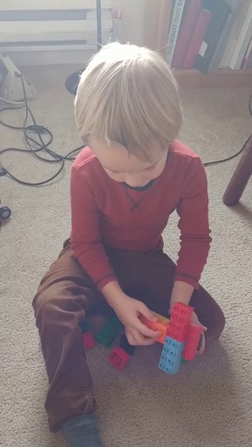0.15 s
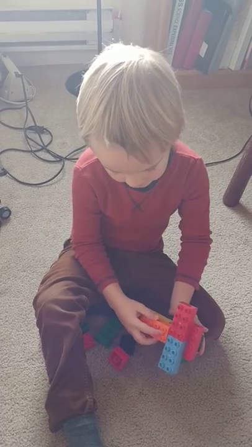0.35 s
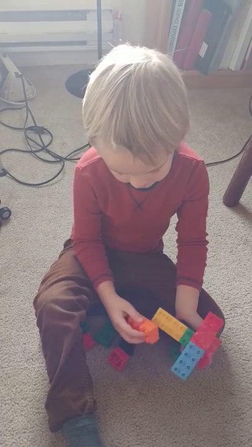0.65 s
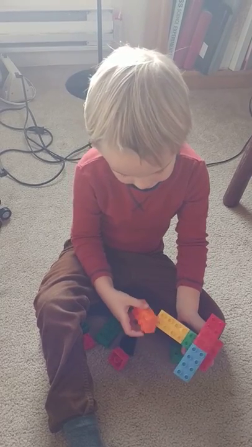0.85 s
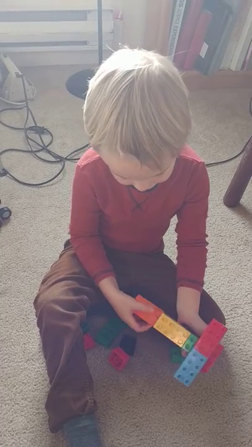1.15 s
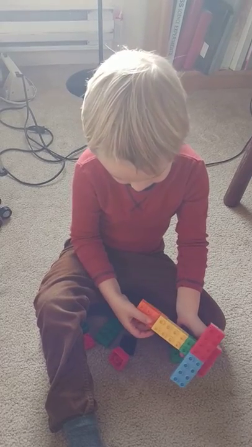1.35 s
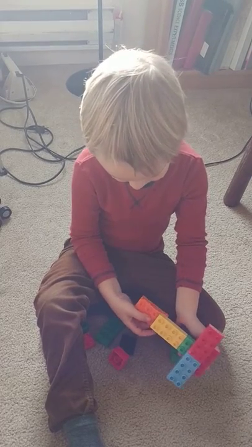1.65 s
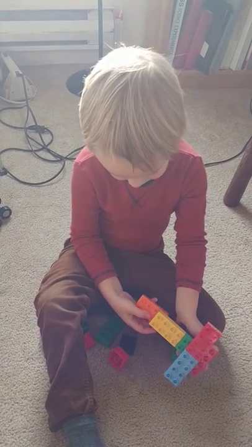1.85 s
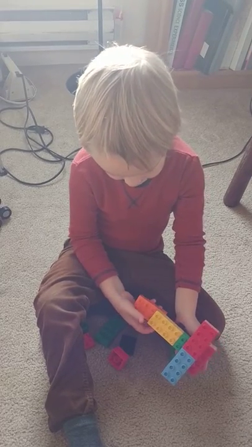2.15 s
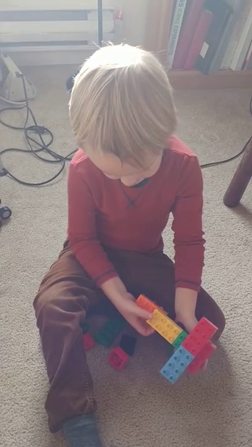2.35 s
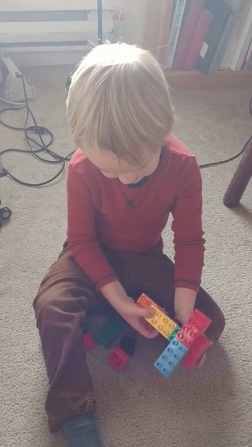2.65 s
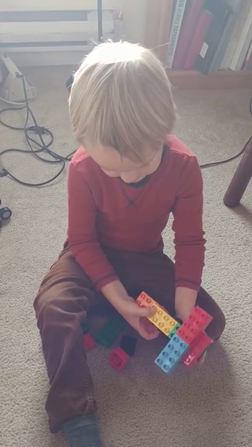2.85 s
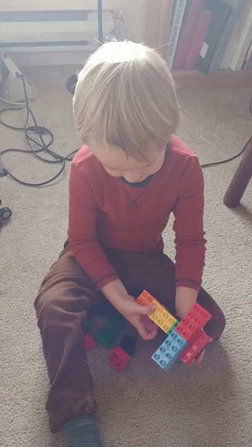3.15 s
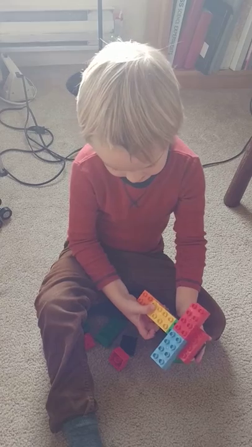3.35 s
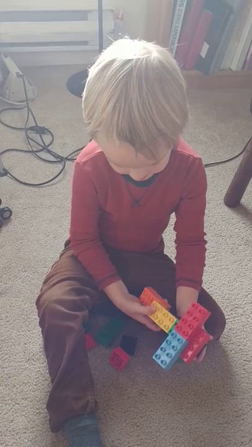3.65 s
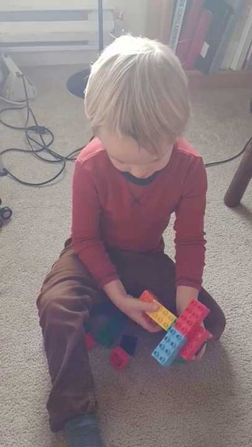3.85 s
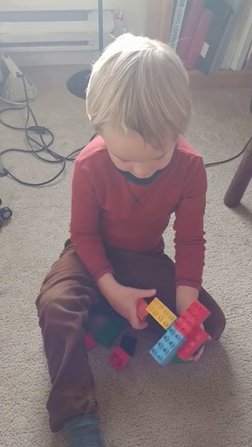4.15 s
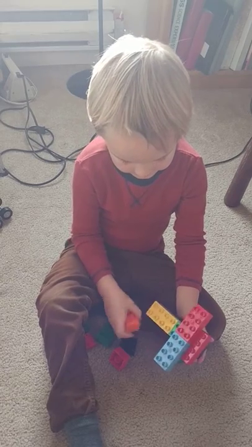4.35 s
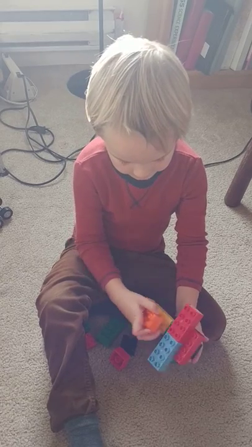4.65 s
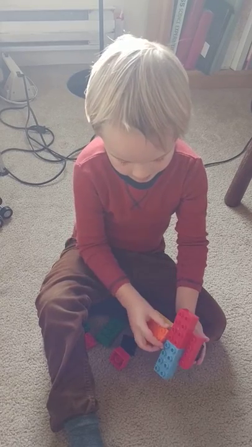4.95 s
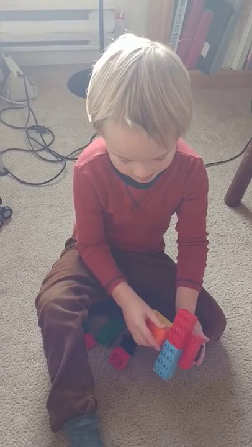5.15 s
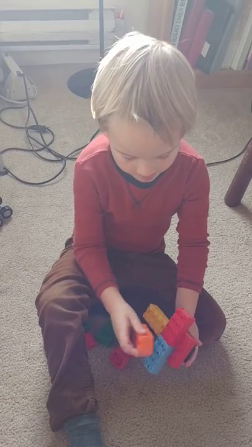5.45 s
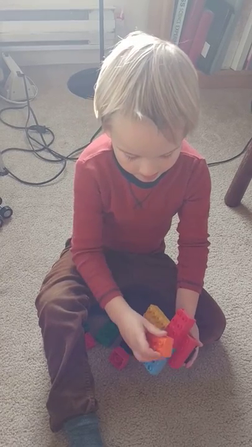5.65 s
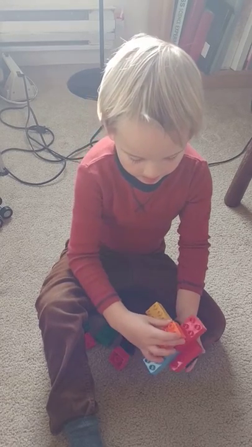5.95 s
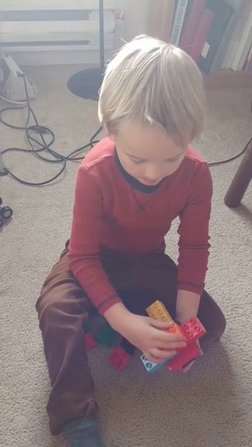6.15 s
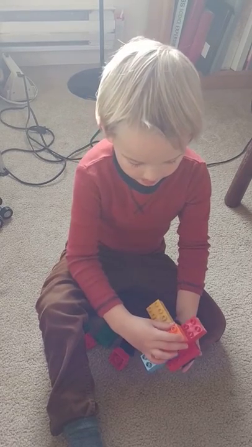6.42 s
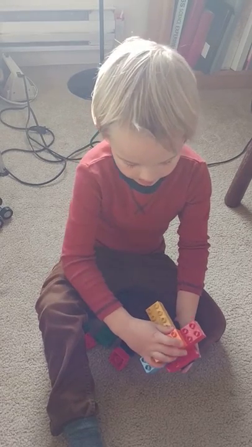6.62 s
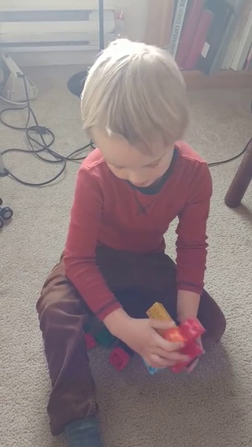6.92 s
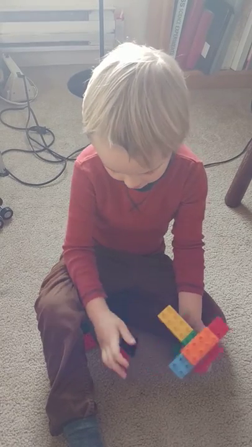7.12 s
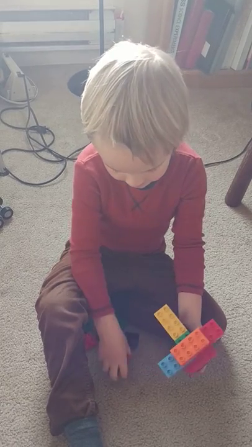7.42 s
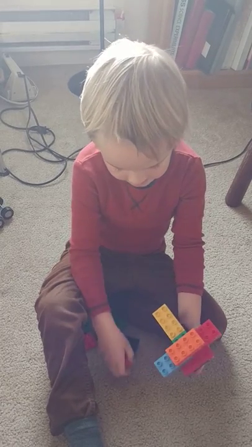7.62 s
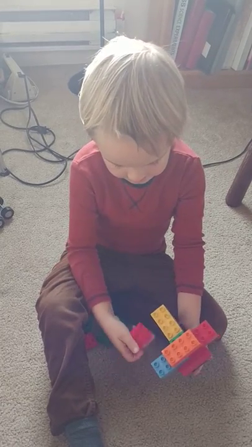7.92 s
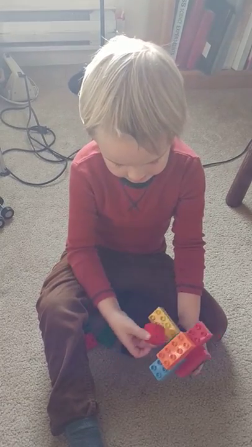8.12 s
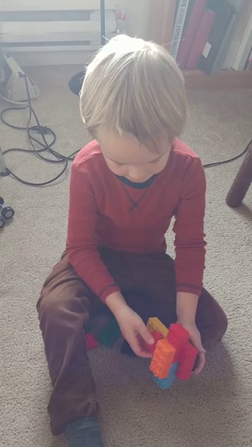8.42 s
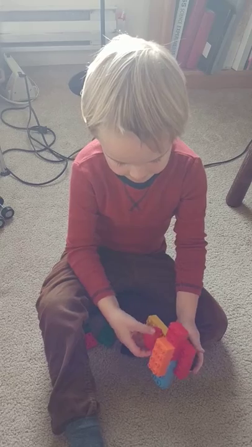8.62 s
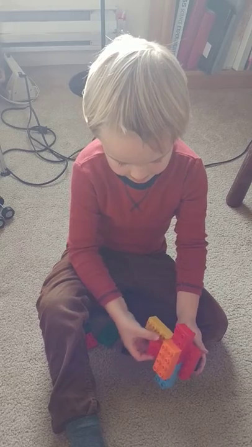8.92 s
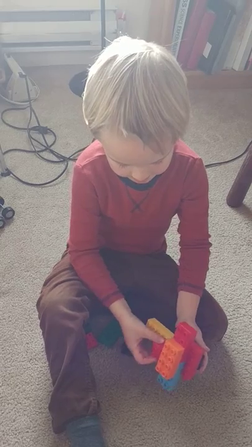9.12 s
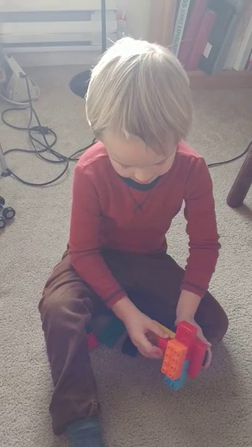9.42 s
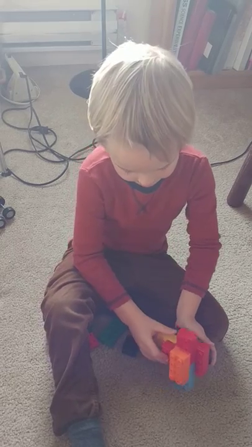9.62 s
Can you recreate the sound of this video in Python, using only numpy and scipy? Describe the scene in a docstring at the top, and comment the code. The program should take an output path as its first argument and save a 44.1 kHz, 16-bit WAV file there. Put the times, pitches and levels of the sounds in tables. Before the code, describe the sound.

Large hollow plastic toy bricks click, clack and snap together in a child's hands in a carpeted room, over faint hum, hiss and thin whistle.

```python
"""Throughout, a low room hum, rumble and hiss, with a thin wavering whistle at the left microphone.
Over it, large hollow plastic bricks are knocked, pushed together and pulled apart over a carpet in a furnished room.
Every contact rings the same brick walls, louder near the wall that is hit; studs tick past edges,
a dull knock lands on the floor, and a soft room answers briefly. Noise makes the background and the room's tail,
a wandering sine the whistle, and decaying sines the contacts."""
import sys
import numpy as np
from scipy import signal
from scipy.fft import rfft, irfft, next_fast_len
from scipy.io import wavfile
from scipy.ndimage import uniform_filter1d

SR = 44100
rng = np.random.default_rng(int(sys.argv[2]) if len(sys.argv) > 2 else 0)


def transcribe(u):
    """Save the signal u as a 16-bit wav file named by the first command-line argument.

    u: samples, shape (n,) or (channels, n), limited to [-1, 1]; the rate is SR.
    q: integer samples, one column per channel.
    """
    v = np.clip(np.atleast_2d(u).T, -1, 1)
    q = np.round(v * 32767).astype(np.int16)
    wavfile.write(sys.argv[1], SR, q)


N = 431298


def from_db(db):
    """Gain of a level in dB."""
    return 10 ** (np.asarray(db) / 20)


def rms_one(x):
    """Scaled to rms 1."""
    return x / np.sqrt(np.mean(x ** 2) + 1e-20)


def ring(force, hz, t60):
    """A two-pole resonance: a unit click sets ringing a sine that starts at height 1 and falls 60 dB in t60."""
    radius = from_db(-60 / (t60 * SR))
    angle = 2 * np.pi * hz / SR
    return signal.lfilter([0, np.sin(angle)], [1, -2 * radius * np.cos(angle), radius ** 2], force)


def ring_time(width_hz):
    """The t60 in s of a resonance of this bandwidth: the narrower it is, the longer it rings."""
    return np.log(1000) / np.pi / width_hz


def add(out, sound, s):
    """Mixes a multichannel sound in at time s."""
    start = round(s * SR)
    out[:, start:start + sound.shape[1]] += sound[:, :N - start]


def floor():
    """Steady noise, mostly shared by both microphones in the bass and separate in the treble, plus narrow hum."""
    # room tone and hiss: freq_hz, left_db_per_hz, right_db_per_hz, likeness (1 = same at both microphones)
    room_tone = [(26.38, -122, -122, 1), (56, -102, -102, 0.96), (110, -99, -99, 0.87),
                 (272, -101, -101, 1), (450, -93, -93.5, 0.42), (1050, -99, -99, 0.32),
                 (1023, -107, -104, .1), (2800, -113, -111, 0.029), (4260, -112, -117, 0.012),
                 (8260, -106, -114, 0.0078), (8630, -126, -133, .01), (9800, -104, -127, 0.0032),
                 (13700, -113, -122, .01), (14500, -129, -129, .01)]
    # narrow hum bands: freq_hz, width_hz, rms_db
    hum_bands = [(292, 20, -76.5), (591.3, 4.7, -69), (969, 5.7, -81.5)]
    size = next_fast_len(N)
    hz, *columns = np.transpose(room_tone)
    log_hz = np.log(np.fft.rfftfreq(size, 1 / SR) + 1)
    left_db, right_db, alike = [np.interp(log_hz, np.log(hz), column) for column in columns]
    alike = np.clip(alike, 0, 1)
    mid, side = rfft(rng.standard_normal((2, size)))
    pair = np.sqrt((1 + alike) / 2) * mid + np.sqrt((1 - alike) / 2) * side * [[1], [-1]]
    # sqrt(SR / 2) brings white noise to 0 dB per Hz
    out = irfft(pair * from_db([left_db, right_db]) * np.sqrt(SR / 2), size)[:, :N]
    for band_hz, width_hz, hum_db in hum_bands:
        band = ring(rng.standard_normal(N), band_hz, ring_time(width_hz))
        out += from_db(hum_db) * rms_one(band)
    return out


def rumble():
    """Noise through two low resonances, its level fluttering at random."""
    centre_hz, width_hz = 60.4, 16
    level_db, swing_db, side_db = -73, 2.5, -7.5   # swing: rms of the flutter; side: relative to mid
    # two equal smoothing filters, each with its corner near 53 Hz
    smoothing = [[1, 0, 0, 1, -np.exp(-2 * np.pi * 1.5 / SR), 0.0073]] * 2
    flutter = rms_one(signal.sosfilt(smoothing, rng.standard_normal(N + SR))[SR:])
    t60 = ring_time(width_hz)
    upper = ring(rng.standard_normal((2, N)), centre_hz, t60)
    mid, side = rms_one(ring(upper, centre_hz * 0.87, t60 * 0.49))
    return from_db(level_db + swing_db * flutter) * (mid + from_db(side_db) * side * [[1], [-1]])


def whistle():
    """A thin sine whose pitch wanders slowly and trembles quickly."""
    # slow path of the pitch: time_s, pitch_hz
    pitch_path = [(0, 10200), (0.498, 9880), (.84, 9700), (1.2, 9900), (1.502, 9600), (2.401, 10100),
                  (2.752, 9890), (2.92, 9630), (3.751, 9950), (4.199, 9570), (4.382, 9980), (4.952, 9600),
                  (5.548, 10040), (5.899, 10020), (7.15, 9930), (7.9, 9850), (8.699, 9680), (9.048, 9590),
                  (9.479, 9750), (9.78, 9600)]
    level_db, tremble_hz, tremble_corner_hz = -65.5, 102.2, 59   # rms level, rms pitch swing, low-pass corner
    s, hz = np.transpose(pitch_path)
    t = np.arange(N) / SR
    pole = np.exp(-2 * np.pi * tremble_corner_hz / SR)
    tremble = rms_one(signal.lfilter([1], [1, -2 * pole, pole ** 2], rng.standard_normal(N)))
    pitch = np.interp(t, s, hz) + tremble_hz * tremble
    phase = 2 * np.pi * np.cumsum(pitch) / SR
    return np.sqrt(2) * from_db(level_db) * np.sin(phase)


def bricks():
    """A sharp touch and a short rub of small slips; fingers damp the walls, only those at the blow ring freely."""
    # contacts: start_s, peak_db (ahead of bass cut, room and ports), low_wall_hz, low_ring_db,
    # high_wall_hz, high_ring_db, treble_db, thud_db, sent_to_room_db
    contacts = [(0.4589, -35.5, 2430, -11, 5810, 1, -14.5, -14, 3),
                (0.4993, -34, 2290, -4, 6300, -11, -7.5, 4.5, -9),
                (0.8099, -40.5, 1630, -7, 3800, 12, -15.5, 2.5, -1),
                (0.8165, -39.5, 1660, -7, 3960, -12, -11, -2, -3),
                (0.9168, -32.5, 2620, -14, 4240, -3, -11.5, -9, -1),
                (0.9323, -29.5, 2630, -3, 3820, 3.5, -12.5, -5.5, -6),
                (0.9537, -31.5, 2630, -19, 3990, -5.5, -5.5, -6, -2),
                (1.2944, -40.5, 2870, -9.5, 3880, -1, -10, -2, 1.5),
                (1.3039, -28.5, 2495, -2, 3800, -13, -9.5, -6.5, -6),
                (1.4132, -38, 2680, -12.5, 3350, 2, -17.5, -5, -1),
                (1.4284, -41, 2900, -19, 4750, -3, -4, 4, -12),
                (1.5174, -43, 2660, 4, 7400, -6, -17, -2, -13),
                (1.6955, -55, 2680, 2.5, 3750, -6, -6, -7, -7.5),
                (1.7364, -50, 2700, -16, 5500, 3, -8, -7, -1), (1.7639, -32, 2557, 12, 6220, -8, 3, 3, -6),
                (1.8941, -38, 2910, 1, 7590, -5, -1.5, 3, -9), (2.3925, -59, 2470, -1, 6800, -8, 4, -9, -3),
                (2.4149, -53.5, 2740, -1, 6830, -6, 2, -9, -10),
                (2.5082, -45.5, 2300, -18, 6350, -8, 1, -14, -2.5),
                (3.261, -47.5, 2640, -24, 5660, -6, 3, -14, -2),
                (3.3388, -57, 1790, 4, 6200, -7, 2, -13, -7),
                (3.6287, -45, 2290, 10, 4050, -6, -6, -10, -10.5),
                (3.6534, -44, 2370, -20, 6350, -19, 1, -7, -7),
                (3.8871, -54.5, 2880, -15, 3980, -6, -23, -11, 4),
                (3.9285, -30, 2790, -13, 5860, -14, -12, -13.5, -8),
                (3.9399, -27.5, 2830, -9, 3890, -3, -11, -15, -7),
                (3.9554, -26, 3140, -14, 7200, -12, -3, -3, -5),
                (4.1214, -33.5, 2850, -5, 4100, -12, -10, -9, -3),
                (4.129, -27.5, 3180, -20, 7110, -3, -7.5, -11.5, -4),
                (4.4977, -58, 1490, -3, 3760, 1, 7, -7, -5.5),
                (4.6613, -57, 3080, -2, 7740, -6, -3, -7, -7),
                (4.786, -31, 2670, -5, 3800, 2, -10.5, -10.5, -3),
                (4.795, -40, 2310, 6, 3800, -6, -9, -7, -11), (4.8474, -41, 2260, 1, 3320, -1, -4, -10, 5),
                (4.8589, -16.5, 2330, 11, 3800, 6, 0.5, -21, -5),
                (4.9122, -18, 2700, 8.5, 3830, -6.5, 0.5, -2, -4),
                (5.0164, -48.5, 2750, -20, 7430, 6, 3, -7, -6),
                (5.0664, -56, 2800, -14, 4010, -8, -17, -4, -4),
                (5.1203, -31.5, 2850, -11, 4160, -15, -9, -7.5, -2),
                (5.1692, -29, 2390, -8, 7630, 2, -5.5, -1.5, -3.5),
                (5.237, -31.5, 2300, -7, 6300, -1.5, -6, -4.5, -6.5),
                (5.7643, -28, 2250, 8.5, 4100, -13, -17.5, -10, -1.5),
                (5.7902, -34, 2675, -2, 4056, 7, -12.5, -2, 0),
                (5.8691, -37.5, 2200, -10, 3550, -11, -15, 5, -1),
                (5.9214, -31.5, 2190, -2.5, 3600, -10, -19, -2, 0.5),
                (5.9798, -35.5, 2320, -12, 4260, -19, -19, -2.5, -0.5),
                (6.0995, -42.5, 2330, -12, 7300, -6, -16, 6.5, -3.5),
                (6.1392, -40, 2200, 0, 4260, -6, -11, -1, -2),
                (6.1489, -34, 2800, -11, 6600, -16, -2, 2.5, 1.5),
                (6.3834, -37, 2080, -7, 4270, -1, -2.5, -15, -3.5),
                (6.3974, -29.5, 1837, -4, 6340, -11, -3, -3, -4.5),
                (6.4951, -38, 2570, -15, 4190, -20, -2.5, 3.5, -5),
                (6.5834, -37, 1853, -4, 5030, -22, 4.5, 6.5, -3),
                (6.6503, -33.5, 2070, -18, 6550, -12.5, -0.5, -0.5, -1.5),
                (6.7685, -38, 3090, -5.5, 5200, -12, 1.5, 4.5, -3),
                (6.9396, -46, 2420, -15, 4030, -12, -8.5, -2.5, -1.5),
                (7.3437, -39.5, 3183, 6, 4370, 5, -5, -7.5, -4),
                (8.2192, -41, 2440, -17.5, 4900, -6, -7.5, 2.5, -5),
                (8.3779, -47.5, 1610, 4, 7180, -4, -3, -2, -5.5),
                (8.4073, -38, 2690, -7, 6100, -9, -10, -3.5, -1.5),
                (8.5131, -47, 1600, -6, 5700, -18.5, -8.5, -8, -8),
                (8.9064, -38.5, 1400, -1.5, 5100, -8, -13.5, -2.5, -6),
                (8.9126, -36, 1935, -21, 5600, -11, -12.5, -6, -1),
                (8.9585, -17, 2816, -2.5, 6360, 3.5, -7, -8, -7.5),
                (9.0199, -32.5, 2910, -10, 6090, -6, -10.5, -13, -3),
                (9.0284, -39, 2700, 6, 6220, -6, -15, -7, -9),
                (9.0389, -20.5, 2484, -2, 6100, -6, -8.5, -7, -5.5),
                (9.2728, -44.5, 1750, 11, 5840, -15, -5, -16, -2.5),
                (9.3516, -43.5, 1630, -3, 5700, -4, -8, -4.5, -4.5),
                (9.3671, -30, 2800, -11.5, 5050, -11, 2.5, -10, -4.5),
                (9.7278, -47.5, 2900, -10, 5720, -6.5, -3.5, -12.5, -6.5)]
    # modes of the brick walls: freq_hz, level_db, free_t60_s
    wall_modes = [(468, -7, 0.1), (764.4, 1.5, 0.02), (1032, -4, 0.041), (1661, -5, 0.034),
                  (1930, 2, 0.016), (2300, -0.5, 0.024), (2760, -0.5, 0.026), (2979, -0.5, 0.023),
                  (3313, -3, 0.015), (3800, -2, 0.029), (4350, 0.5, 0.0097), (4566, -2.5, 0.025),
                  (4650, -0.5, 0.017), (5460, -6, 0.028), (6220, -5, 0.016), (6700, -5.5, 0.025),
                  (7430, -2.5, 0.015), (8550, -6, 0.015), (9700, 4, 0.0095), (10830, 14.5, 0.011),
                  (11506, 21, 0.0048), (13700, 8.5, 0.0066), (13800, -6, 0.012)]
    grip = 0.15   # share of the free t60 left under the fingers
    wall_reach_oct, scatter_db, ear_scatter_db = 0.06, 2, 2.47
    rub_db, rub_t60_s, slips_per_s, attack_s = -3, 0.015, 6000, 0.0039
    crack_follows, crack_below_treble_db = 0.98, 12.5   # the top follows the treble of the blow
    lean_db, bass_cut_hz = 1, 475   # lean: left over right
    out, size = np.zeros((4, N)), 6000
    hz, base_db, t60 = np.transpose(wall_modes)
    t = np.arange(size) / SR
    signs = (-1) ** np.arange(len(hz))[:, None]
    sines = np.sin(2 * np.pi * hz[:, None] * t) * signs
    free, held = [rfft(from_db(-60 * t / (share * t60[:, None])) * sines, 2 * size) for share in (1, grip)]
    luck = rng.random((len(contacts), 2, size))
    scatter = rng.standard_normal((len(contacts), 3, len(hz)))
    for row, (chance, sign), spread in zip(contacts, luck, scatter):
        s, peak_db, low_hz, low_db, high_hz, high_db, treble_db, thud_db, sent_db = row
        slips = (chance < slips_per_s / SR) * (2 * sign - 1) * from_db(rub_db - 60 * t / rub_t60_s)
        slips[0] = 1
        # softened attack: the first slips start lower and rise within a few milliseconds
        slips *= 1 - 0.66 * np.exp(-t / attack_s)
        crack_db = crack_follows * treble_db - crack_below_treble_db
        part_db = np.select([hz < 1300, hz < 3300, hz < 9000], [thud_db, 0, treble_db], crack_db)
        # one scatter common to both sides, one for each side
        gains = from_db(base_db + part_db + scatter_db * spread[0] + ear_scatter_db * spread[1:])
        struck = 0
        for wall_hz, ring_db in ((low_hz, low_db), (high_hz, high_db)):
            distance = np.log2(hz / wall_hz) / wall_reach_oct
            struck = struck + from_db(ring_db) * np.exp(-.5 * distance ** 2)
        force = rfft(slips, 2 * size)
        force /= uniform_filter1d(np.abs(force), size=50)   # the rub drives all walls evenly
        sound = irfft((gains @ held + (gains * struck) @ free) * force)[:, :size]
        sound /= np.abs(sound.mean(axis=0)).max()
        sound *= from_db(peak_db + np.array([[lean_db], [-lean_db]]) / 2)
        # hands shield one side: rows 0-1 go straight to the ports, rows 2-3 into the room
        add(out, np.vstack([sound, sound * from_db(sent_db)]), s)
    # small bricks radiate little bass
    bass_cut = signal.butter(4, bass_cut_hz, "high", fs=SR, output="sos")
    return signal.sosfilt(bass_cut, out + 1e-18)


def tails():
    """One spot's answer: a few reflections and a dense tail that carpet and furniture swallow, treble first."""
    # first reflections: delay_s (3 % longer on the right), level_db (ahead of the dulling)
    reflections = [(.0085, -7.5), (0.0135, -18), (0.025, -13)]
    tail_db, t60_s, rise_s = 9, 0.18, 0.0039   # tail_db: energy ahead of the treble losses
    shared_below_hz, dull_hz = 366, 10000
    bright_above_hz, bright_extra_db_per_s = 7300, 108.5
    t = np.arange(SR // 3) / SR
    tail = rng.standard_normal((2, len(t))) * from_db(-60 * t / t60_s) * (1 - np.exp(-(t / rise_s) ** 2))
    # long waves reach both ports alike
    tail[1] += signal.lfilter(*signal.butter(1, shared_below_hz, fs=SR), tail[0] - tail[1])
    tail = from_db(tail_db) * rms_one(tail) / np.sqrt(len(t))
    dull = signal.lfilter(*signal.butter(1, bright_above_hz, fs=SR), tail)
    tail = dull + (tail - dull) * from_db(-bright_extra_db_per_s * t)
    for s, echo_db in reflections:
        tail[0, round(s * SR)] += from_db(echo_db)
        tail[1, round(s * SR * 1.03)] += from_db(echo_db)
    return signal.lfilter(*signal.butter(1, dull_hz, fs=SR), tail)


def room(direct, sent, count=5):
    """The hands keep moving, so the room answers the bricks from one of a few spots in turn."""
    spot_s = 0.23
    spot = (np.arange(N) / SR / spot_s).astype(int) % count
    out = direct
    for k in range(count):
        share = uniform_filter1d((spot == k) * 1., size=400)   # short crossfade between spots
        out = out + signal.oaconvolve(sent * share, tails(), axes=1)[:, :N]
    return out


def ticks():
    """A stud slips past an edge: one click through the same broad resonance twice."""
    # thin ticks: start_s, peak_db (ahead of room and ports), centre_hz, ring_cycles (in one t60), sent_to_room_db
    stud_slips = [(2.257, -43, 7540, 2.2, -6), (2.262, -46.5, 5800, 8.3, 6.5),
                  (2.2742, -26.5, 7100, 4.7, -13.5), (2.6858, -40.5, 11500, 2.1, 6.5),
                  (4.7662, -45, 7500, 2.47, -1), (5.55, -41.5, 3400, 7.1, -13)]
    out, click = np.zeros((4, N)), signal.unit_impulse(1000)
    for s, peak_db, hz, cycles, sent_db in stud_slips:
        t60 = cycles / hz
        sound = np.diff(ring(ring(click, hz, t60), hz, t60))
        sound /= np.abs(sound).max()
        # rows 0-1 direct, rows 2-3 into the room
        levels_db = peak_db + np.array([0, 0, sent_db, sent_db])
        add(out, np.outer(from_db(levels_db), sound), s)
    return out


def knocks():
    """Dull low taps on the floor: a click sets two low resonances ringing against each other."""
    # knocks: start_s, height_db (of each resonance, ahead of room and ports), upper_hz, t60_s
    floor_taps = [(2.539, -34.5, 544, 0.017)]
    sent_db = -13.5   # into the room
    out = np.zeros(N)
    for s, height_db, hz, t60 in floor_taps:
        force = np.full(N, 1e-18)
        force[round(s * SR)] = from_db(height_db)
        out += ring(force, hz, t60) - ring(force, hz * 0.78, t60)
    return out * from_db([[0], [0], [sent_db], [sent_db]])


def port(x, peaks):
    """A microphone port colours the sound with a chain of resonant peaks and dips."""
    for hz, width_hz, peak_db in peaks:
        angle, gain = 2 * np.pi * hz / SR, from_db(peak_db / 2)
        k = np.sin(angle) * width_hz / hz / 2
        middle = -2 * np.cos(angle)
        x = signal.lfilter([1 + k * gain, middle, 1 - k * gain], [1 + k / gain, middle, 1 - k / gain], x)
    return x


def scene():
    """Bricks in the room through the two ports, over the steady background."""
    # peaks and dips of each microphone port: centre_hz, width_hz, gain_db
    left_peaks = [(2250, 470, 0), (5100, 4200, 4.5), (9560, 440, 0.5), (10200, 1700, 14.5)]
    right_peaks = [(2150, 900, 3.5), (6180, 4800, 12.5), (9560, 810, -8.5), (11500, 870, -22.5)]
    direct, sent = (bricks() + ticks() + knocks()).reshape(2, 2, N)
    left, right = room(direct, sent)
    left = np.roll(left, 3)   # samples later: the right port is slightly nearer
    ports = np.array([port(left, left_peaks) + whistle(), port(right, right_peaks)])
    return ports + floor() + rumble()


def record(dry):
    """The microphones' range: the deepest bass and the top are cut."""
    low_hz, top_hz = 41, 16450   # bass corner; from top_hz up all lies 70 dB down
    dry = signal.sosfilt(signal.butter(2, low_hz, "high", fs=SR, output="sos"), dry)
    return signal.sosfilt(signal.cheby2(12, 70, top_hz, fs=SR, output="sos"), dry)


dry = scene()
out = record(dry)
transcribe(out)
```